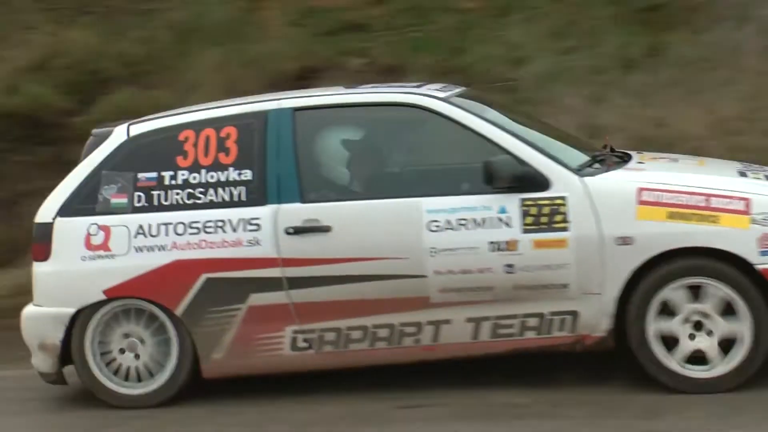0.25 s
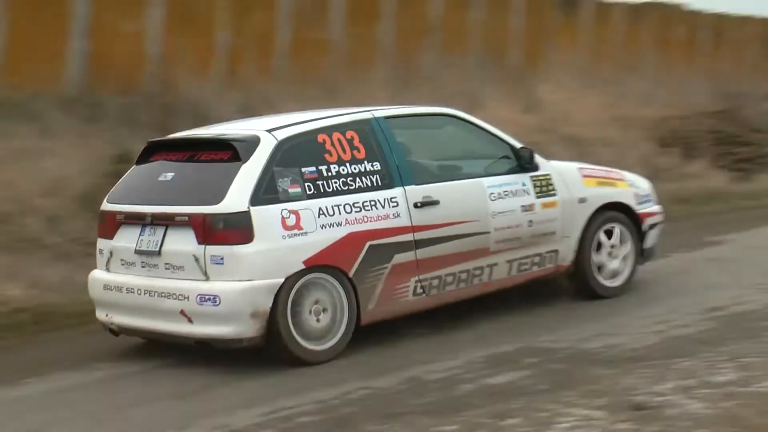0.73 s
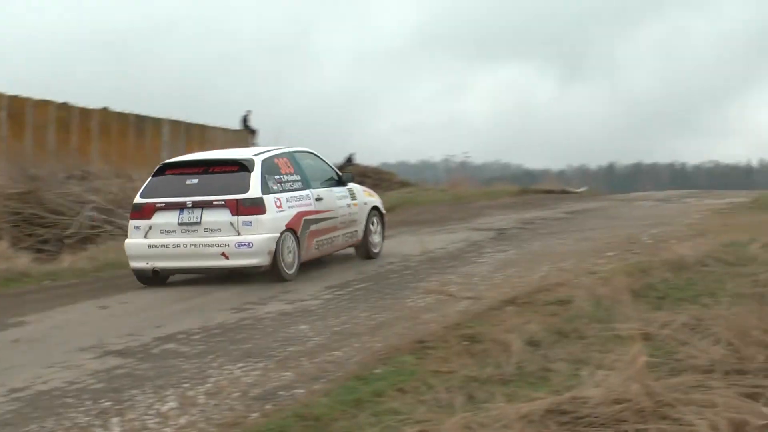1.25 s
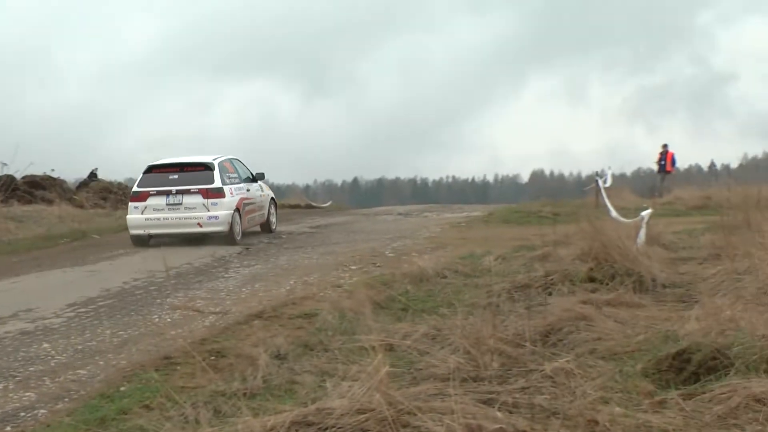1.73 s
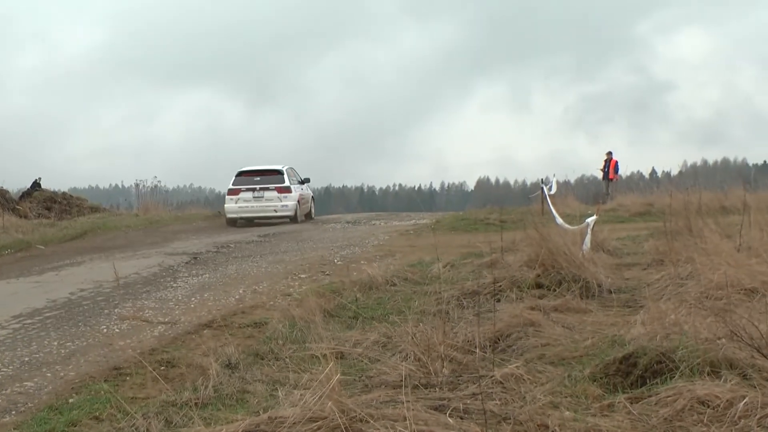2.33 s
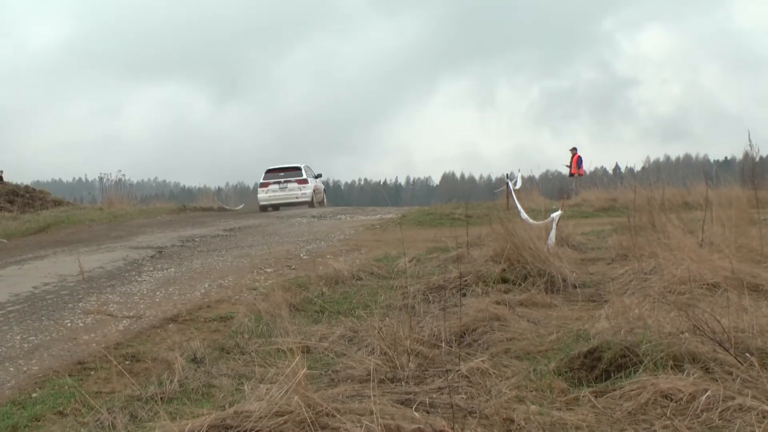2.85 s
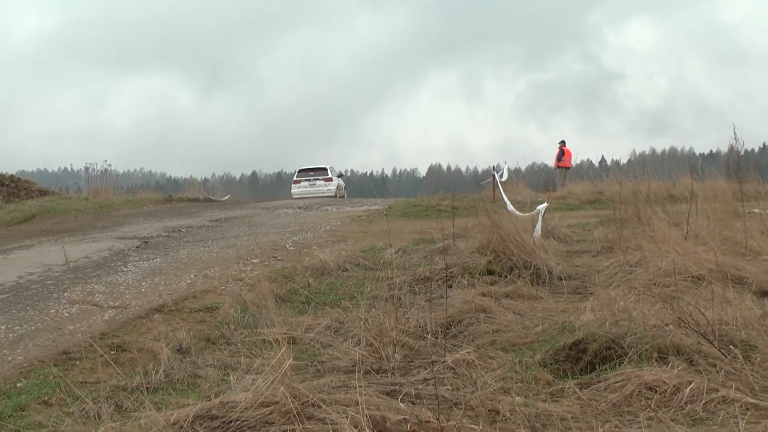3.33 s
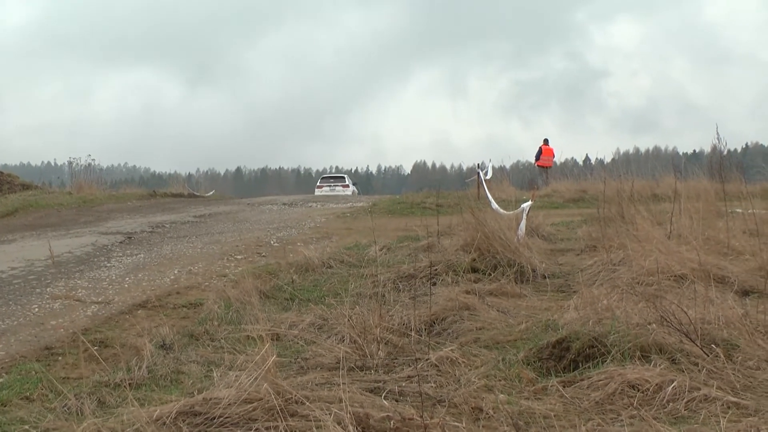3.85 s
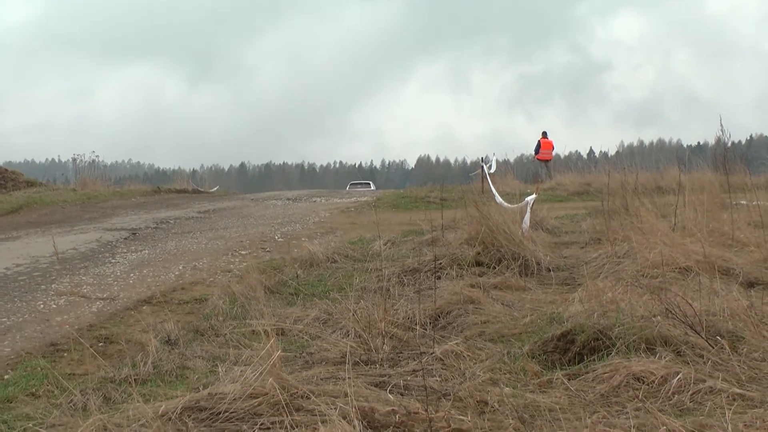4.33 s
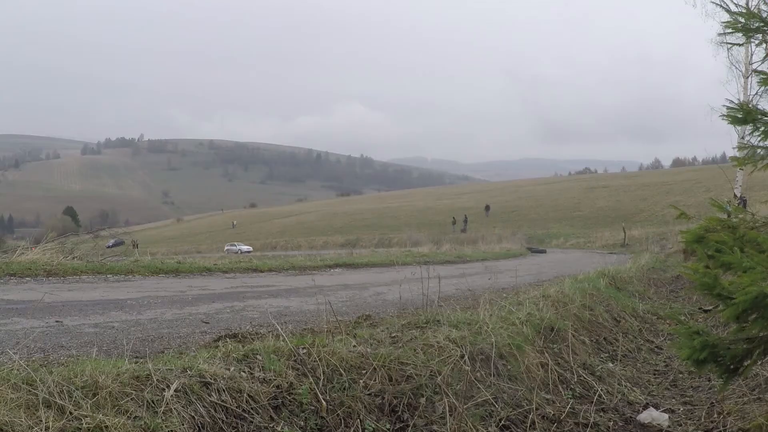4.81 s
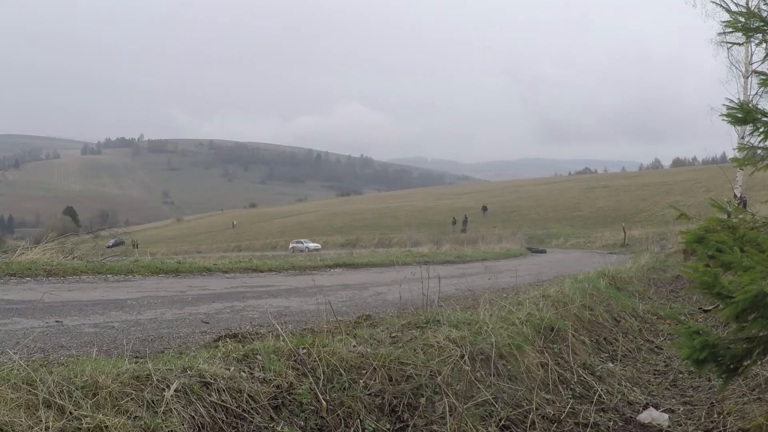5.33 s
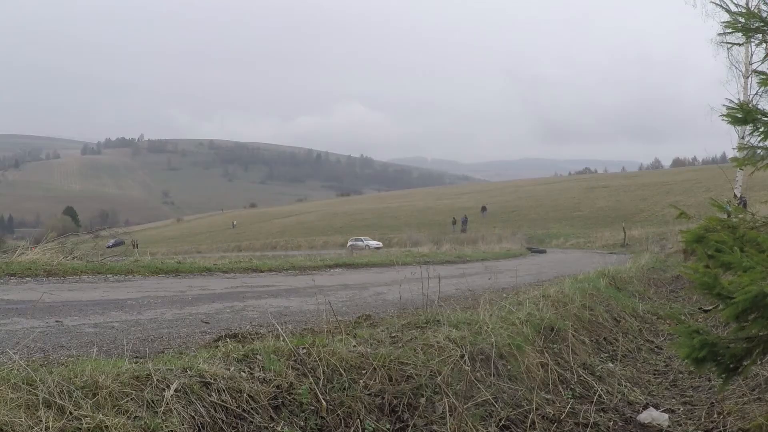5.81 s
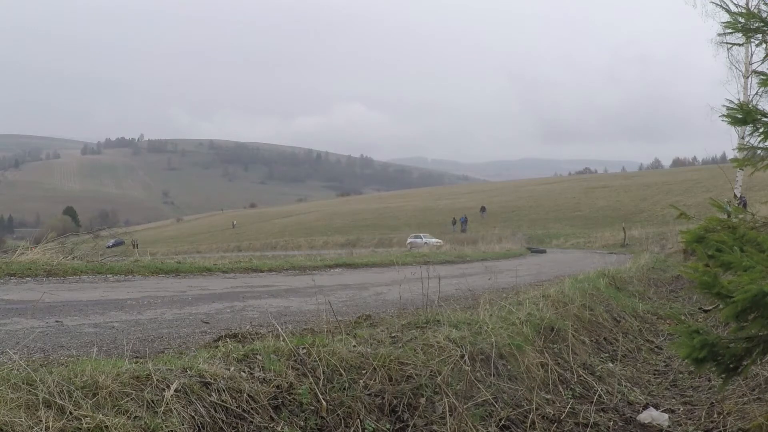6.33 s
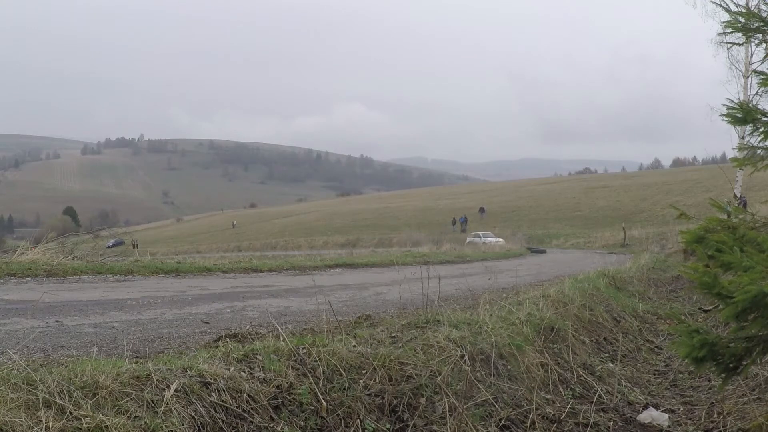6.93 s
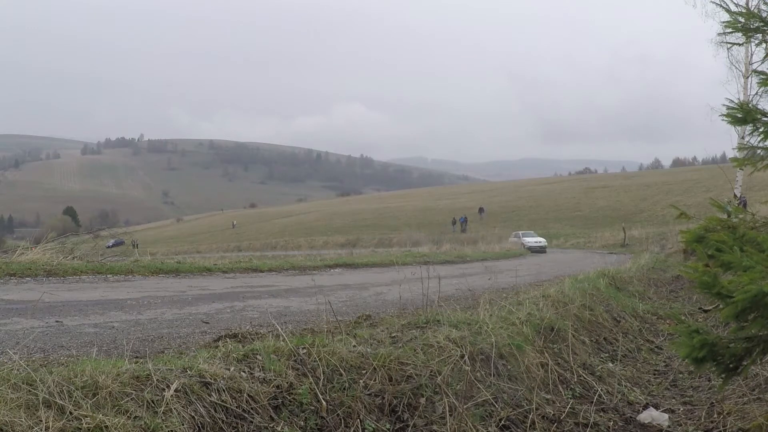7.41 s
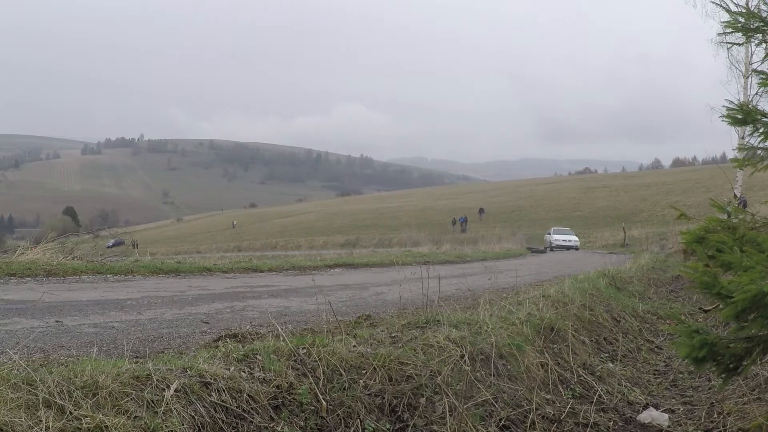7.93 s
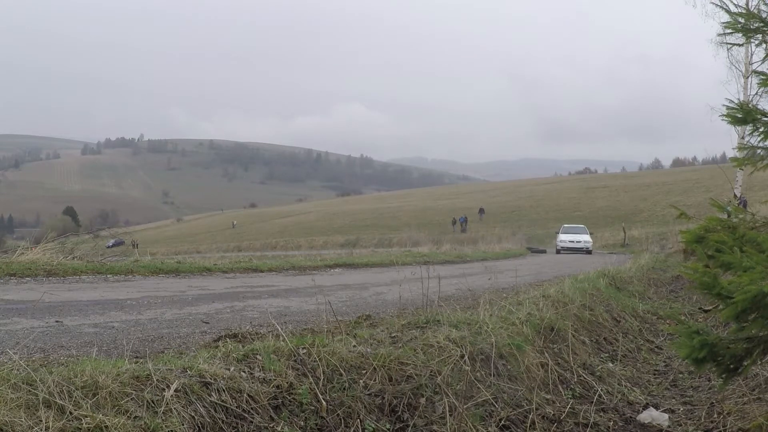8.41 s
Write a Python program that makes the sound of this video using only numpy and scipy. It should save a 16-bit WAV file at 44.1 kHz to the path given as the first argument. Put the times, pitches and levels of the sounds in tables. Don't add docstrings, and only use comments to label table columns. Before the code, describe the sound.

Stereo close-up of a rally car's raspy exhaust leaving on loose gravel, pitch rising with flutters of wheelspin, then ragged misfiring, a throttle lift, a backfire crack and a lower gear-change note building again. Suddenly the sound becomes small and distant: steady hiss, a thin engine note that dips, blips and coasts around a bend, light ticking from the camera, then a darker bark swelling as the car approaches.

```python
import sys
import numpy as np
from scipy import signal
from scipy.fft import rfft, irfft
from scipy.io import wavfile
from scipy.ndimage import uniform_filter1d

SR = 44100
rng = np.random.default_rng(int(sys.argv[2]) if len(sys.argv) > 2 else 0)


def volts(x):
    e = np.asarray(x, float) / 20
    return 10 ** e


def unload_audio(sound):
    columns = np.transpose(np.atleast_2d(sound))
    steps = np.round(np.clip(columns, -1, 1) * 32767)
    wavfile.write(sys.argv[1], SR, steps.astype(np.int16))


N = 381888
T = np.arange(N) / SR
HZ = np.arange(4097) * SR / 8192 + 1e-3
CUT_S = 4.5726


def level(x, db):
    return x * volts(db) / np.sqrt(np.mean(x ** 2))


def steady(x):
    return x / np.sqrt(uniform_filter1d(x ** 2, size=4096) + 1e-18)


def columns(table):
    s, *cols = np.transpose(table)
    return [np.interp(T, s, c) for c in cols]


def bumps(rows):
    return sum(size * np.interp(T, [s - rise, s, s + fall], [0, 1, 0]) for s, size, rise, fall in rows)


def gain(points):
    hz, db = np.transpose(points)
    return volts(np.interp(np.log(HZ), np.log(hz), db))


def resonances(modes):
    power = sum(volts(2 * db) / (1 + (2 * (HZ - hz) / width) ** 2) ** 2 for hz, width, db in modes)
    return np.sqrt(power)


def edges(lo_hz, hi_hz):
    return 1 / (1 + (lo_hz / HZ) ** 16) - 1 / (1 + (hi_hz / HZ) ** 16)


def part(x, mag):
    return signal.oaconvolve(x, np.fft.fftshift(irfft(mag)), "same")


def colour(x, mag):
    cepstrum = irfft(np.log(mag + 1e-7))
    cepstrum[1:4096] *= 2
    cepstrum[4097:] = 0
    return signal.oaconvolve(x, irfft(np.exp(rfft(cepstrum)))[:4096])[:N]


def walk(rate):
    k = int(SR / rate)
    held = np.repeat(rng.standard_normal(N // k + 1), k)
    return 1.3 * uniform_filter1d(uniform_filter1d(held, k), k)[:N]


def delayed(x, lag_s):
    return np.interp(np.arange(N) - np.maximum(lag_s, 0) * SR, np.arange(N), x)


def patchy(x, lo_hz, hi_hz, patchy_db, rate, tilt_db=0):
    cuts = np.geomspace(lo_hz, hi_hz, num=6)
    out = 0
    for a, b in zip(cuts, cuts[1:]):
        swell_db = patchy_db * walk(rate) + tilt_db * np.log2(a / cuts[2])
        out = out + volts(swell_db) * part(x, edges(a, b))
    return out


def focus(x, swells):
    hz, s, z = signal.stft(x, SR, nperseg=1024, noverlap=768)
    db = 0
    for at_s, centre_hz, peak_db, spread_s, spread_oct in swells:
        in_time = ((s - at_s) / spread_s) ** 2
        in_pitch = (np.log2((hz[:, None] + 1) / centre_hz) / spread_oct) ** 2
        db = db + peak_db * np.exp(-.5 * in_time - .5 * in_pitch)
    return signal.istft(z * volts(db), SR, nperseg=1024, noverlap=768)[1][:N]


CYLINDER_OFFSETS = np.array([(-.15, .8, -.3, -.95), (.5, -.3, .4, -.6)])


def firings(hz, depths, scatter_db, slip_s):
    pop_s = 2.7907
    turns = np.cumsum(hz) / SR
    turns = turns + (1 - turns[int(pop_s * SR)]) % 4
    miss = (.9 - turns[int(CUT_S * SR)]) % 1 - .5
    turns = turns + np.interp(T, [pop_s, CUT_S], [0, miss])
    count = np.arange(int(turns[0]) + 1, int(turns[-1]))
    at = np.interp(count, turns, np.arange(N))
    chance = rng.standard_normal((2000, 2))[:len(count)]
    offsets = np.array(CYLINDER_OFFSETS)
    size = 1 + sum(d[at.astype(int)] * p[count % 4] for d, p in zip(depths, offsets))
    size = size * volts(scatter_db * chance[:, 1])
    at = at + slip_s * SR * chance[:, 0]
    taps = at.astype(int)[:, None] + np.arange(-7, 9)
    off = taps - at[:, None]
    pulses = np.zeros(N + 32)
    np.add.at(pulses, taps + 16, size[:, None] * np.sinc(off) * np.cos(np.pi * off / 16) ** 2)
    return pulses[16:N + 16], turns % 1


# (time [s], firing rate [Hz])
REVS = [(0, 156.1), (.1, 155), (.61, 160.7), (.94, 165.1), (1.19, 170.9), (1.65, 181.9), (1.93, 187.7),
        (2.24, 198.8), (2.55, 204.4), (2.72, 216.9), (2.93, 191.9), (3.104, 183.4), (3.108, 186.7),
        (3.336, 145.8), (3.54, 145.7), (3.96, 148), (4.16, 153.2), (4.57, 162.3)]
# (time [s], extra rate [Hz], run-up [s], bite [s])
SPINS = [(.02, 6, 0.023, 0.071), (.54, 6, .4, 0.079), (.81, 4, .18, 0.11), (1.1, 2, .12, 0.081),
         (1.47, 3.5, .2, .15), (1.75, 9.5, .1, .18), (2.12, 11, 0.16, .08), (2.41, 5, .05, 0.08),
         (2.8, 6, 0.09, .05), (3.0, -6, 0.025, 0.027), (3.28, 7.5, 0.034, .04), (3.642, 9.5, 0.083, 0.055),
         (3.79, 4.5, .07, .09), (3.882, 9.5, .09, 0.048), (4.05, 7, .09, 0.079), (4.11, 5.5, .06, 0.041),
         (4.25, 2.5, 0.066, .12)]
# (time [s], suddenness [ratio], closing [s], reopening [s])
LIFTS = [
    (2.885, 1.9, 0.058, 0.0337),
    (3.1, 8, 0.093, 0.0075),
]
# (time [s], depth [0-1])
MISFIRE = [
    (2.715, 0),
    (2.73, .8),
    (2.83, .95),
    (2.885, .9),
    (2.9, .25),
    (2.97, .2),
    (3.01, .65),
    (3.1, 0),
]
# (time [s], level [dB], bark brightness [dB per octave])
AIM = [(0, 5.5, -3), (.06, 4.5, -0.5), (.27, -1, 6), (.43, 6, 6.5), (.56, 1, 6), (.78, 10, 3),
       (1.15, 7.5, 11.5), (1.31, 0.5, -2), (1.93, -1, -1), (2.1, 0.5, 5.5), (2.55, 0, 6.5), (2.7, 5, 3),
       (2.8, -4.5, 1.5), (3.11, 8, 0.5), (3.25, -5, 3), (3.38, 0.5, 1), (4.08, -0.5, 3), (4.57, 0.5, 6.5)]
# (time [s], level [dB], fall [s], recovery [s])
NULLS = [(.07, -2.5, 0.081, 0.046), (.38, -3.5, .08, 0.063), (.73, -8, 0.13, 0.13), (.95, -4, 0.28, 0.53),
         (1.8, -3, 0.31, 0.21), (2.12, -1, 0.077, 0.045), (2.28, -3.5, 0.065, 0.086),
         (2.4, -1.5, 0.11, .12), (2.8, -2, 0.28, 0.17), (2.99, -3, 0.049, 0.049),
         (3.055, -8.5, 0.026, 0.026), (3.246, -6, 0.033, 0.067), (3.4, -2, 0.036, 0.35),
         (3.71, -2, 0.13, 0.2), (3.98, -4.5, 0.031, 0.038), (4.16, -1.5, 0.043, .08)]
# (time [s], level [dB], rise [s], fall [s])
FLARES = [(.68, 4, .02, 0.018), (.98, 6, 0.018, 0.05), (1.08, 1.5, .02, 0.023), (.58, 14, 0.08, 0.23),
          (.83, 8, 0.04, 0.064), (2.06, 8.5, 0.057, 0.062), (2.8, 5.5, 0.096, 0.068),
          (3.112, 3.5, 0.0038, .02), (3.36, 9, 0.064, 0.16), (2.35, 4.5, 0.11, 0.22),
          (2.975, 7.5, 0.092, 0.038), (3.19, -3, 0.094, 0.046), (3.642, 9, 0.087, 0.15)]
AIM_SHARES = (0.27, 1.39, 1)
# (bark [dB per Hz], rasp [dB per Hz], crack [dB per Hz])
SPIN_SHARES = (0.2131, 0.71, 0.48)
# (boom [dB], bark [dB], rasp [dB], crack [dB], brightness [dB per octave])
LIFT_CHANGES = (-4.5, -13, -23.5, -39.5, -3.5)


def near_controls():
    spin = uniform_filter1d(bumps(SPINS), size=1000)
    lift = np.minimum(bumps(LIFTS), 1)
    hz = columns(REVS)[0] + spin
    aim_db, tilt_db = columns(AIM)
    bark, rasp, crack = (a * aim_db + b * spin for a, b in zip(AIM_SHARES, SPIN_SHARES))
    boom = -16.5 + np.interp(T, [0, .51], [2.5, 0]) + bumps(NULLS)
    bark = bark - 24.5 - 8 * np.log2(hz / 170)
    bark = bark + 4 * columns(MISFIRE)[0]
    bark = bark + np.interp(T, [0, .45], [-3.5, 0])
    rasp = rasp - 45
    crack = crack - 51.5 - T + bumps(FLARES)
    return [hz] + [x + d * lift for x, d in zip((boom, bark, rasp, crack, tilt_db), LIFT_CHANGES)]


# (frequency [Hz], level [dB])
PIPE = [(24, -33), (40, -6.5), (173, 13), (329, 2.5), (804, -6.5), (1780, -26), (2340, -36), (3470, -43),
        (15000, -69)]
# (frequency [Hz], width [Hz], level [dB])
SILENCER = [(725.4, 66, 4.5), (1240, 31, -15.5), (2154, 540, 8), (2574, 240, 10), (3680, 1000, 2.5),
            (4630, 790, 0.5), (8900, 6800, -0.5)]


def exhaust_tone():
    return gain(PIPE) * (1 + resonances(SILENCER)) / np.sqrt(1 + (HZ / 11000) ** 4)


# (time [s], lag [ms])
BOUNCE = [(0, 1.72), (.5, 1.19), (.7, 1.03), (.9, 1.37), (1.9, 1.6), (2.15, 2.2), (2.6, 1.5), (3.3, 1.78),
          (4.57, 1.71)]


def near_car():
    hz, boom_db, bark_db, rasp_db, crack_db, tilt_db = near_controls()
    depths = columns(MISFIRE) + [np.full(N, .04)]
    even, phase = firings(hz, depths, scatter_db=0.52, slip_s=.00001)
    wild, _ = firings(hz, [d / 2 for d in depths], scatter_db=2.0, slip_s=.00003)
    tone = exhaust_tone()
    pipe = -colour(even, tone)
    lag_s = (columns(BOUNCE)[0] + 0.15 * walk(1.4)) / 1000
    pipe = pipe + 0.65 * delayed(part(pipe, edges(790, 30000)), lag_s)
    boom = steady(part(pipe, edges(74, 276.4)))
    thump = depths[0] * delayed(level(part(pipe, edges(61, 135)), -11), .002)
    bark = steady(patchy(pipe, 265, 1300, .8, 7, tilt_db))
    bark = delayed(bark, .0006)
    gas = rng.standard_normal(N) * (.3 + np.exp(-phase / .2))
    rasp = colour(level(-even, 0) + level(gas, -20), tone)
    rasp = rasp + 0.41 * delayed(rasp, lag_s)
    rasp = steady(patchy(rasp, 1300, 3200, patchy_db=2.2, rate=7, tilt_db=2.5))
    shock = colour(level(-wild, 0) + level(gas, -9.5), tone)
    crack = steady(patchy(shock, 3200, 16000, 2.2, 22))
    exhaust = volts(boom_db) * (boom + thump) + volts(bark_db) * bark
    exhaust = exhaust + volts(rasp_db - 2 * depths[0]) * rasp + volts(crack_db) * crack
    return exhaust + tyres() + ground_rumble() + intake(hz) - backfire(tone)


# (frequency [Hz], level [dB])
GRAVEL = [(15, -82), (25, -61), (140, -28.5), (183, -20), (253, -19), (704, -8), (1670, -24.5), (3740, -40),
          (8850, -56), (15600, -72)]


def tyres():
    out = level(colour(rng.standard_normal(N), gain(GRAVEL)), -32) * volts(0.24 * walk(8.1))
    out = out * volts(np.interp(T, [2.75, 2.88, 3.1, 3.2], [7.0, 5.0, -5.0, 5.0]))
    return part(out, 1 - .72 * edges(240, 850) - .72 * edges(850, 1800) - .4 * edges(1800, 3400))


def ground_rumble():
    return level(part(rng.standard_normal(N), edges(27, 180)), -58) * volts(np.interp(T, [0, .5], [9, 0]))


# (time [s], level [dB])
INTAKE = [
    (0, -26),
    (.25, -35),
    (.45, -40.5),
    (.6, -65),
    (1, -64),
]
# (multiple of firing rate [ratio], level [dB])
RUNNER_ORDERS = [(1.251, 5), (2.746, -2.5)]


def intake(hz):
    gulps, _ = firings(hz / 2, [], scatter_db=1.2, slip_s=.00003)
    airbox = [(230.6, 39, 0.5), (420, 43, -14.0), (534, 30, 9.0), (890, 88, -11.0)]  # (Hz, width Hz, dB)
    growl = part(gulps, resonances(airbox))
    turns = 2 * np.pi * np.cumsum(hz) / SR
    song = sum(volts(db) * np.sin(k * turns) for k, db in RUNNER_ORDERS)
    return volts(columns(INTAKE)[0]) * (steady(growl) + song)


def backfire(tone):
    spark = 1. * (np.arange(N) == int(3.1086 * SR))
    bang = colour(spark, tone * (HZ / 600) ** 0.21)
    return volts(-12) * bang / np.abs(bang).max()


# (time [s], frequency [Hz], level [dB],
# spread [s], spread [octaves])
BAND_SWELLS = [
    (0.601, 4250, 1.5, 0.033, 0.1),
               (0.26, 1090, -16, 0.018, 0.13), (0.26, 1590, 10, 0.05, 0.12), (0.51, 1310, 3, 0.48, 0.12),
              (0.64, 1410, 8, 0.014, 0.13), (0.65, 945, -2.5, 0.35, 0.2), (0.74, 460, -8.5, 0.05, 0.22),
              (1.18, 1090, -4, 0.12, 0.73), (1.43, 1680, -9, 0.44, 0.068), (1.51, 1270, 5, 0.025, 0.083),
              (1.64, 397, 4, 0.042, 0.27), (1.68, 1070, 4, 0.16, 0.2), (1.89, 1260, 5, 0.027, 0.2),
              (2.05, 1650, 0, 0.021, 0.32), (2.1, 630, -9, 0.019, 0.6), (2.2, 1190, -17, 0.032, 0.11),
              (2.23, 1000, -1, 0.03, 0.1), (2.34, 1050, 8.5, 0.12, 0.12), (2.38, 1250, -3.5, 0.057, 0.057),
              (2.39, 795, -3, 0.099, 0.23), (2.4, 1380, -6.5, 0.2, 0.079), (2.592, 730, -19.5, 0.023, 0.2),
              (2.71, 1660, 3.5, 0.017, 0.15), (2.859, 590, 3, 0.2, 0.23), (2.89, 1510, -10, 0.04, 0.16),
              (2.96, 780, -2.5, 0.14, 0.2), (2.98, 420, -18, 0.025, 0.19), (3.059, 1687, -1.5, 0.0518, 0.1),
              (3.087, 610, 6.5, 0.031, 0.6), (3.2, 1330, -6, 0.022, 0.3), (3.34, 360, 0, 0.35, 0.16),
              (3.76, 1010, 4, 0.05, 0.6), (3.86, 1330, -8, 0.042, 0.12), (4.03, 1180, 4, 0.054, 0.633),
              (4.4, 950, -8.5, 0.13, .07), (.92, 1144, 0.5, 0.33, .06), (3.75, 1750, 2, 0.28, .15),
              (4.32, 465, 5.5, 0.2, 0.076), (4.37, 1660, 3.5, 0.35, 0.12), (4.53, 1250, -13, 0.26, 0.11),
               (3.8, 13500, -5.5, .9, .2), (0.01, 10300, 6.5, 0.13, 0.55), (0.38, 3170, 7.5, 0.029, 0.24),
               (0.54, 5130, 6.5, 0.057, 0.19), (0.58, 9450, -11, 0.016, 0.46), (0.59, 2500, -4, 0.05, 0.13),
               (0.69, 2170, 4, 0.055, 0.21), (0.71, 7250, 2.5, 0.061, 0.14), (0.78, 3400, -5.5, 0.2, 0.32),
               (0.96, 2090, -3.5, 0.031, 0.19), (1.06, 7130, -9, 0.024, 0.17),
               (1.139, 3360, -6, 0.025, 0.3), (1.16, 8980, 2.5, 0.015, 0.34),
               (1.51, 2650, 5.5, 0.055, 0.17), (1.53, 5660, 3.5, 0.088, 0.87),
               (1.6, 1930, -2.5, 0.076, 0.11), (2.07, 10680, -5.5, 0.03, 0.74), (2.12, 3420, 3, 0.062, 0.2),
               (2.34, 8400, 3, 0.11, 0.12), (2.35, 1890, 7.5, 0.074, 0.07), (2.87, 4206, -2.5, 0.17, 0.54),
               (2.91, 1800, 6.5, 0.28, 0.083), (2.98, 6200, -4, 0.056, 0.14), (3.04, 2700, -3, 0.12, 0.17),
               (3.1, 4570, 5.5, 0.022, 0.38), (3.28, 7230, 6.5, 0.03, 0.18), (3.419, 2540, 2, 0.022, 0.4),
               (3.48, 8480, 3, 0.019, 0.26), (3.6, 8500, 6, 0.0099, 0.25), (3.62, 2800, -8, 0.018, 0.47),
               (3.88, 10680, -2.5, 0.031, 0.6), (4.02, 8900, 4.5, 0.045, 0.15),
               (4.06, 2540, -2.5, 0.35, 0.093), (4.09, 3000, 2, 0.05, 0.29), (4.24, 9510, -2, 0.05, 0.18),
               (4.4, 6400, 6.5, 0.017, 0.87), (4.53, 6040, -5.5, 0.2, 0.61)]


def near_bands(x):
    return focus(x, BAND_SWELLS)


# (frequency [Hz], side minus mid [dB])
SIDE = [(60, -37.5), (110, -32.5), (200, -30.5), (380, -58), (700, -39.5), (1290, -24), (2380, -12.5),
        (4400, -12), (8120, -4), (15000, -9.5)]
# (frequency [Hz], left minus right [dB])
LEAN = [(700, .3), (1290, 1.5), (2380, 1.3), (4400, 2.4), (8120, 4), (15000, .8)]


def roadside(mid):
    scatter = rng.standard_normal(512) * np.exp(-T[:512] / .002)
    scattered = signal.oaconvolve(mid, scatter / np.linalg.norm(scatter))[:N]
    side = part(scattered, gain(SIDE)) * volts(2) * walk(12)
    lean = (gain(LEAN) - 1) / (gain(LEAN) + 2) * edges(600, 30000)
    side = side + part(mid, lean) * np.interp(T, [1.5, 3.5], [1, .5])
    return [mid + side, mid - side]


# (time [s], firing rate [Hz])
FAR_REVS = [(4.57, 186.7), (5, 178.3), (5.25, 159.8), (5.45, 148.5), (5.62, 149.6), (5.8, 181),
            (5.93, 215.3), (6.1, 193), (6.3, 182.2), (6.7, 167.7), (6.97, 172.3), (7.25, 176), (7.5, 181.3),
            (7.85, 184), (8.0, 197.3), (8.32, 189.7), (8.66, 188.7)]
# (time [s], extra rate [Hz], run-up [s], bite [s])
FAR_SPINS = [
    (6.85, 8, .15, .12),
    (7.15, 16, .18, .1),
    (8.17, 16, .1, 0.077),
    (8.4, 6.5, 0.089, .1),
    (8.46, 26, 0.13, .16),
]
# (time [s], level [dB])
FAR_LOAD = [(4.57, -58.5), (4.83, -54), (5.01, -56.5), (5.06, -72.5), (5.3, -91), (5.55, -90.5),
            (5.74, -75.5), (5.9, -63), (6.07, -72), (6.32, -63.5), (6.5, -80), (6.7, -85), (6.8, -61.5),
            (7.16, -59.5), (7.82, -59), (7.92, -49), (8.1, -47.5), (8.66, -44)]
# (time [s], bark under load [dB], firing tone [dB], brightness [dB per octave])
FAR_TURN = [
    (4.57, -22.5, -58.5, 4),
    (5.1, -17, -65.5, -3),
    (5.9, -33, -63, 0),
    (6.7, -10, -64, -7),
    (7.2, -12, -63, -6),
    (7.3, -6, -58, -21),
    (7.7, -2, -60, -19),
    (7.95, -10, -55, -9),
    (8.66, -10.5, -57.5, -9.5),
]
# (time [s], level [dB], fall [s], recovery [s])
FAR_NULLS = [
    (5.15, -8.5, 0.16, 0.35),
    (5.74, -6, 0.19, 0.16),
    (6.32, -4, 0.28, 0.2),
    (6.68, -4, 0.16, .12),
    (7.82, -9.5, 0.061, 0.11),
    (8.07, -17, 0.16, 0.12),
    (8.22, -14, .12, 0.089),
    (8.435, -9, 0.026, 0.038),
]
# (frequency [Hz], width [Hz], level [dB])
FAR_PIPE = [(298, 210, -14), (350, 69, 1), (457, 45, -4.5), (525, 120, 1), (730, 82, 6.5), (907, 110, 10.5),
            (1055, 64, 17)]
# (frequency [Hz], width [Hz], level [dB])
FAR_RASP = [(1156, 490, -11.5), (1599, 160, -7), (2030, 260, .5), (2400, 340, 1), (2830, 260, -2),
            (3650, 440, -4), (4250, 400, -5), (4950, 750, -8), (6860, 1200, -19), (9730, 1200, -32.5)]
# (centre frequency [Hz], width [Hz],
# level of the subtracted resonance [dB])
FAR_NOTCHES = [(3290, 130, 11), (5870, 170, 8)]
# (multiple of firing rate [ratio], level under the bark [dB])
INLET_ORDERS = [(.75, -14), (2.25, -7.5), (2.749, -11), (5.248, -17)]


def far_car():
    hz = columns(FAR_REVS)[0] + bumps(FAR_SPINS)
    rasp_db, = columns(FAR_LOAD)
    bark_db, boom_db, tilt_db = columns(FAR_TURN)
    bark_db = np.maximum(bark_db + rasp_db, -98)
    boom_db = boom_db + bumps(FAR_NULLS)
    nearing = np.interp(T, [7.8, 8.1], [.05, .35])
    even, phase = firings(hz, [nearing], scatter_db=1.5, slip_s=.00003)
    turns = 2 * np.pi * np.cumsum(hz) / SR
    shaft = volts(np.interp(T, [5.9, 6.1, 6.6, 6.75], [-48, -2.0, 0.5, -38.5])) * np.sin(0.85 * turns)
    boom = steady(volts(1.3 * walk(8.8)) * (np.sin(turns) + shaft))
    gas = rng.standard_normal(N) * (.6 + np.exp(-phase / .3))
    bark = colour(level(even, 0) + (.1 + nearing) * level(gas, 0), resonances(FAR_PIPE))
    bark = steady(patchy(bark, 250, 1400, 4.0, 11, tilt_db))
    facing = np.sqrt(2) * np.interp(T, [7.85, 8.05], [0, 1])
    bark = bark + facing * sum(volts(db + 3.8 * walk(23)) * np.sin(k * turns) for k, db in INLET_ORDERS)
    rasp_tone = resonances(FAR_RASP) * np.abs(1 - resonances(FAR_NOTCHES))
    rasp = colour(level(even, 3) + (.55 + 1.4 * nearing) * level(gas, 0), rasp_tone)
    rasp = steady(patchy(rasp, 1100, 11000, patchy_db=2.5, rate=10))
    behind_rise = np.interp(T, [7.75, 7.9], [.7, 0])
    rasp = rasp - behind_rise * part(rasp, edges(4250, 30000))
    rumble = level(part(rng.standard_normal(N), edges(27, 100)), -22.0)
    return volts(boom_db) * boom + volts(bark_db) * bark + volts(rasp_db) * (rasp + rumble)


# (time [s], frequency [Hz], level [dB], spread [s],
# spread [octaves])
FAR_BAND_SWELLS = [(4.73, 1870, -13, 0.23, 0.14), (4.7, 3540, -9, 0.2, 0.06), (4.74, 1246, 0.5, 0.24, 0.088),
                   (5.41, 3180, -6, 0.11, 0.68), (5.46, 633, -9.5, 0.31, 0.33), (6.15, 4750, 7.5, 0.22, 0.14),
                   (6.25, 1336, -9, 0.2, 0.2), (6.59, 628, -1, 0.098, 0.31), (6.83, 4740, -11, 0.05, 0.71),
                   (6.84, 1060, -11, 0.05, 0.12), (6.96, 530, 12, 0.14, 0.18), (7.15, 560, -8.0, 0.024, 0.22),
                   (7.24, 1607, 2, 0.35, 0.15), (7.28, 525, 10, 0.05, 0.2), (7.52, 3354, -5, 0.09, 0.22),
                   (7.591, 890, 0, 0.025, 0.21), (7.74, 2480, 7.5, 0.072, 0.093), (7.769, 940, 6, 0.042, 0.18),
                   (7.78, 420, -5.5, 0.023, 0.4), (7.911, 370, 5, 0.063, 0.16), (8.17, 3480, 8, 0.056, 0.064),
                   (8.38, 790, 6, 0.11, 0.2), (8.46, 1479, 5.5, 0.042, 0.2), (8.56, 3134, -6.0, 0.056, 0.3),
                   (8.632, 1060, -1, 0.1, 0.21)]


def far_bands(x):
    return focus(x, FAR_BAND_SWELLS)


# (frequency [Hz], level [dB])
FIELD = [(12, -40), (20, 5.5), (47, 1.5), (103, -6.5), (157, -3.5), (259, -18), (1500, -22.5), (2410, -16),
         (6940, -30.5), (8670, -30.5), (9430, -33), (13500, -32.5), (15600, -60)]
# (frequency [Hz], width [Hz], level [dB])
HOUSING = [(2340, 1900, -13.5), (3650, 360, -4), (4980, 510, 6)]
# (time [s], level [dB], knock [dB])
TICKS = [
    (5.7528, -57, -15),
    (6.0601, -59, -15),
    (6.355, -55, -13),
    (6.6633, -41, -31),
    (6.9561, -49, -3),
    (7.2639, -48, -12),
    (7.5527, -52, -12),
]


def camera():
    hiss = level(colour(rng.standard_normal(N), gain(FIELD) * (1 + resonances(HOUSING))), -61.5)
    breeze = level(part(rng.standard_normal(N), edges(21, 60)) * volts(2.5 * walk(3)), -88.0)
    gate = np.clip(4 * np.cos(2 * np.pi * 50 * (T - .008)) - 1.6, 0, 1)
    out = hiss + breeze + level(gate * np.sin(2 * np.pi * 8550 * T), -80)
    t = T[:882]
    for s, db, knock_db in TICKS:
        click = (np.sin(2 * np.pi * 4900 * t) + np.sin(2 * np.pi * 6600 * t)) / 2 * np.exp(-t / 0.0013)
        knock = volts(knock_db + 6.0) * np.sin(2 * np.pi * 1350 * t) * np.exp(-t / .002)
        start = int(s * SR)
        out[start:start + len(t)] += volts(db) * (click + knock)
    return out


# (time [s], mesh rate [Hz], level [dB])
WHINE = [
    [(5.74, 815, -86.5), (5.908, 859.5, -73), (6.102, 885.3, -72), (6.21, 885.7, -70.5),
     (6.332, 870.9, -74), (6.378, 807.5, -77), (6.4, 882.4, -90)],
    [(7.2, 819.5, -76), (7.274, 828.7, -75), (7.332, 880.2, -70), (7.392, 846.7, -73), (7.49, 837.6, -78),
     (7.55, 809.8, -71)],
]
# (multiple [ratio], level [dB])
WHINE_ORDERS = [(2.0, 11), (2.5, 14)]
OVERTONE_LEVELS = (-14.5, -8)


def gearbox():
    out = 0
    for table, over_db in zip(WHINE, OVERTONE_LEVELS):
        hz, db = columns(table)
        on = np.clip(np.minimum(T - table[0][0], table[-1][0] - T) / 0.01, 0, 1)
        turns = 2 * np.pi * np.cumsum(hz) / SR
        overtones = sum(volts(over_db + d + 1.9 * walk(10)) * np.sin(k * turns) for k, d in WHINE_ORDERS)
        out = out + on * np.sqrt(2) * volts(db) * (np.sin(turns) + overtones)
    return out


def scene():
    near = roadside(near_bands(near_car()))
    far = far_bands(far_car() + gearbox()) + camera()
    return np.where(T < CUT_S, near, far)


def top_cut(x):
    return signal.sosfilt(signal.butter(12, 15720, fs=SR, output="sos"), x)


def record(dry):
    return top_cut(dry)


dry = scene()
out = record(dry)
unload_audio(out)
```